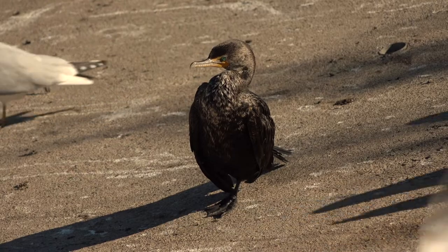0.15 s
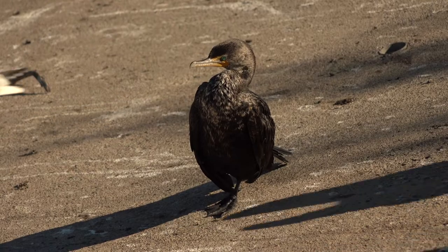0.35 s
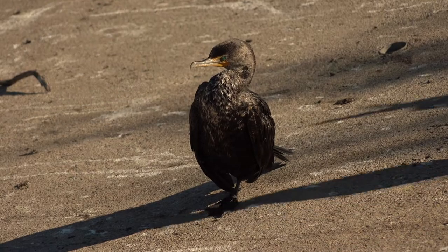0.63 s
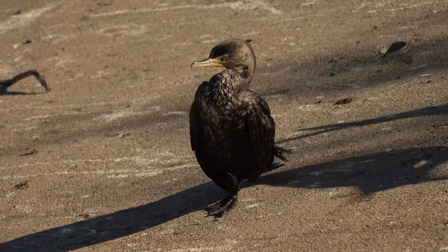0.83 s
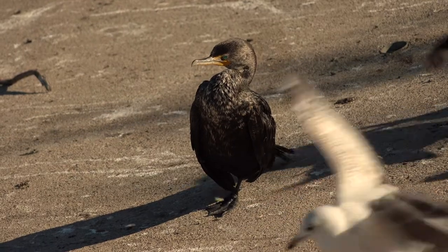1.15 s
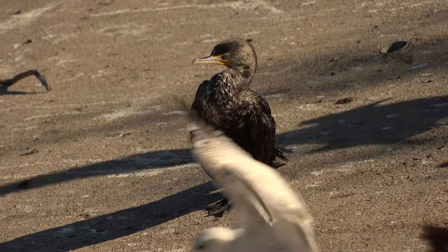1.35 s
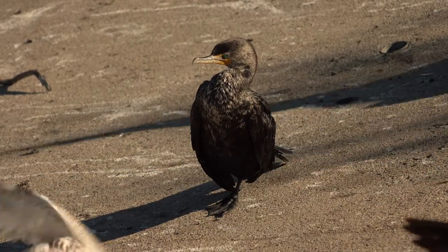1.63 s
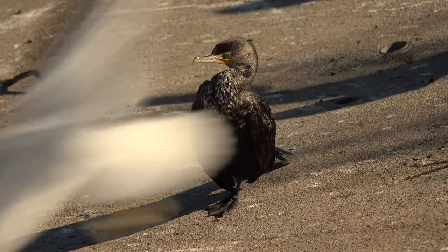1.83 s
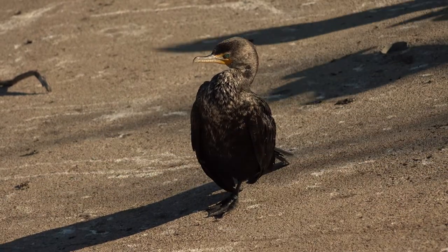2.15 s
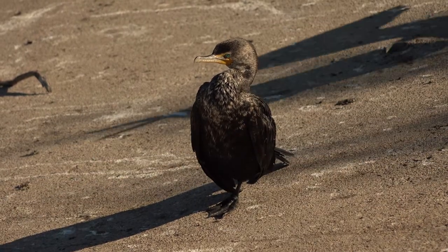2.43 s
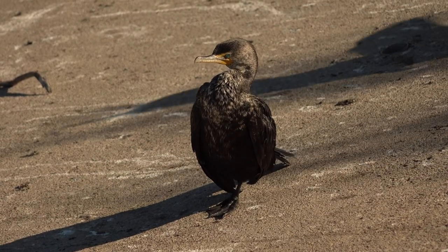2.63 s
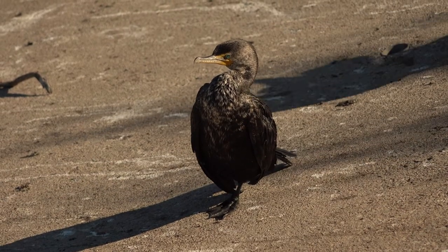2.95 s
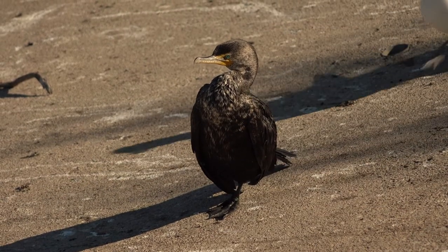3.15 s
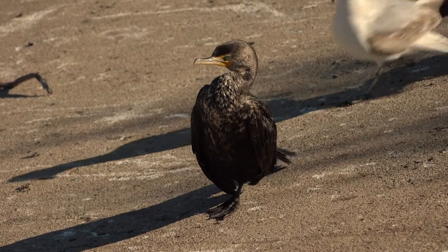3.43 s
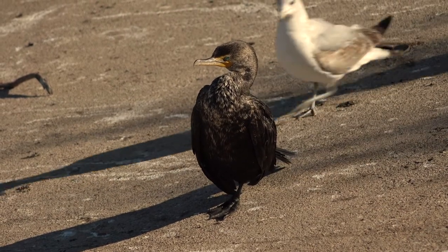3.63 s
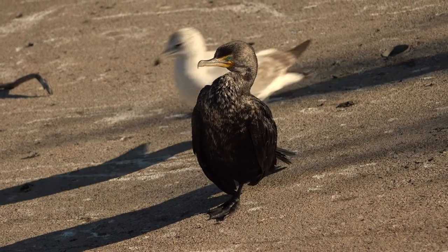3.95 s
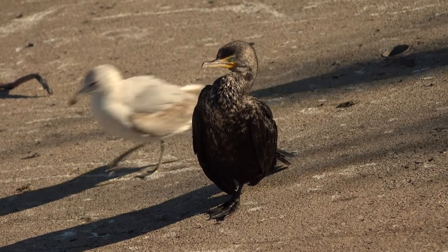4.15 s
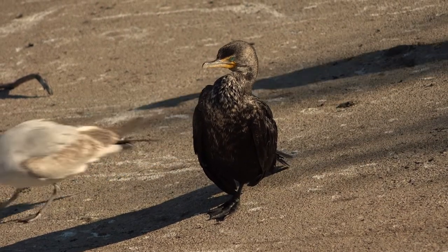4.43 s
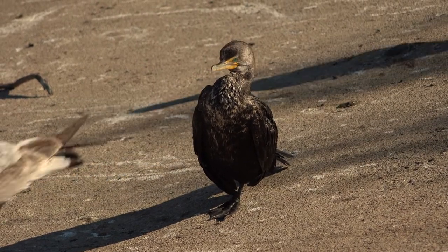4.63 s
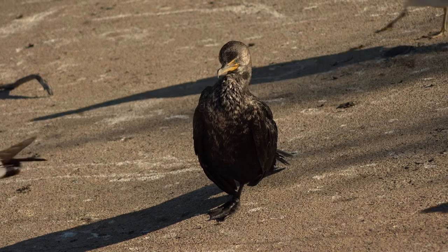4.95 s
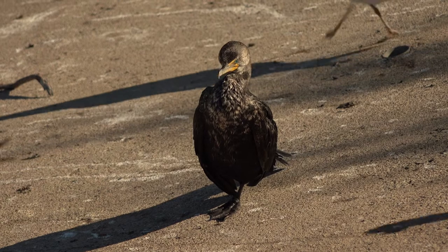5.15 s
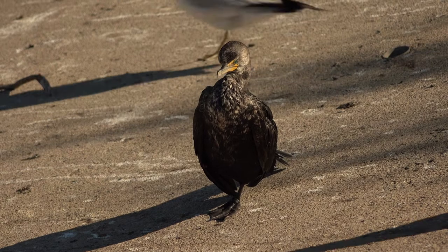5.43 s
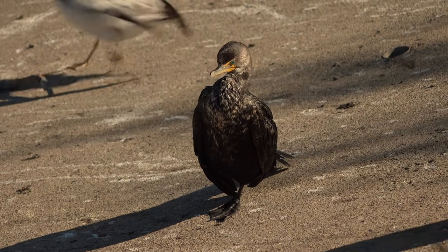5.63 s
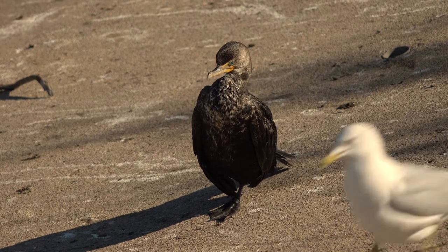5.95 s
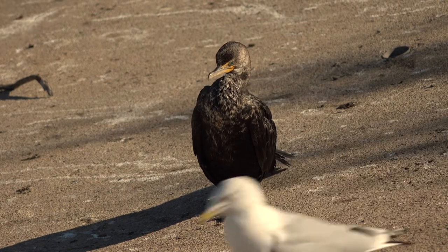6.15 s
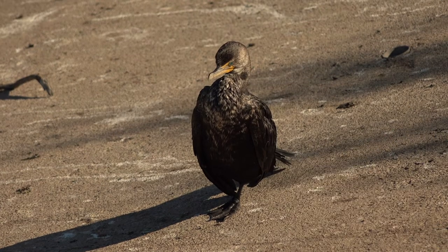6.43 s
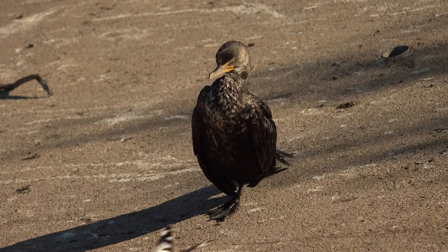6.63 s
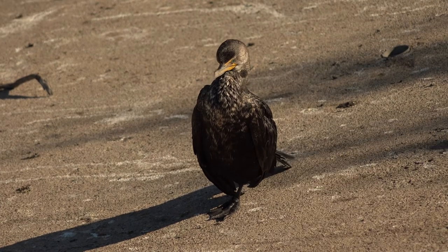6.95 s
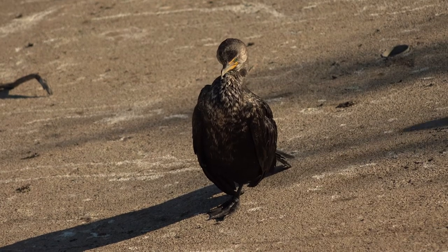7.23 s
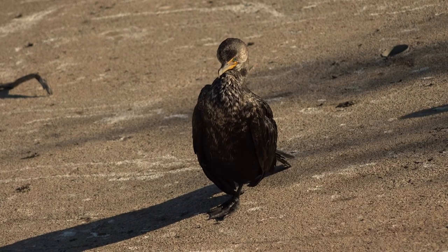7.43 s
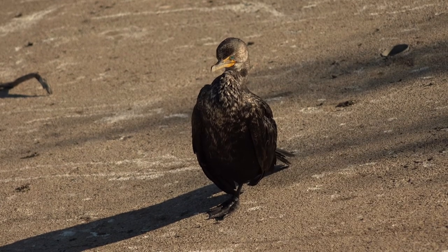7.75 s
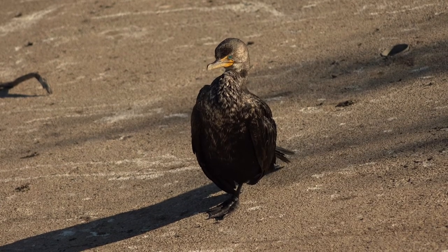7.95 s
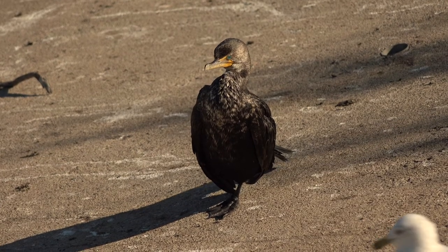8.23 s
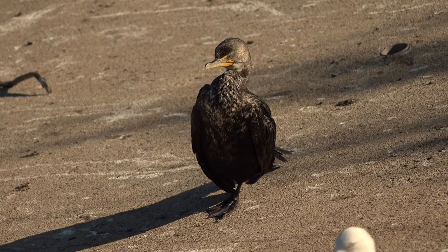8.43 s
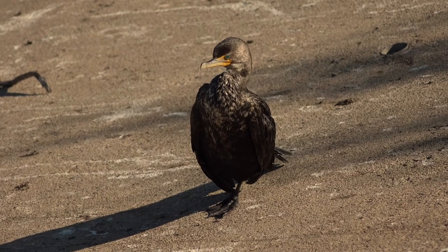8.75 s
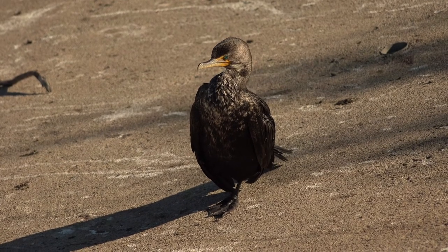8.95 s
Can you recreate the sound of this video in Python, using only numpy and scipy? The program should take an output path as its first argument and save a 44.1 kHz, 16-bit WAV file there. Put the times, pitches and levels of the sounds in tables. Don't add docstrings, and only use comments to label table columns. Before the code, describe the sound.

Close gulls on an open shore call in irregular bursts: thin whistles and croaks first, rapid laughing yelps near two seconds, then a long rasping screech after three. After a quieter gap a second screech breaks out at five, followed by yelps and mews. A lull, then chained wailing cries near eight. Gravel ticks throughout, low surf and wind, and a faint engine hum. Mono outdoor microphone, faint short echo.

```python
import sys
import numpy as np
from scipy import signal
from scipy.fft import rfft, irfft, next_fast_len
from scipy.io import wavfile
from scipy.ndimage import uniform_filter1d

SR = 44100
rng = np.random.default_rng(int(sys.argv[2]) if len(sys.argv) > 2 else 0)


def waveform_to_disk(signal):
    frames = np.transpose(np.atleast_2d(signal))
    scaled = np.clip(frames, -1, 1) * 32767
    samples = np.round(scaled).astype(np.int16)
    wavfile.write(sys.argv[1], SR, samples)


def natural_amplitude(level_db):
    exponent = np.asarray(level_db, float) / 20
    return 10 ** exponent


N = 401301

# level in dB of partial 1, 2, 3..
PURE_PARTIALS = [6.5, -14, -41, -26.5, -46]
BRIGHT_PARTIALS = [6.5, -1, -26, -36, -30]
DOUBLED_PARTIALS = [4, 9.5, -12.5, -22, -18]


def walk(rate, size):
    hold = int(SR / rate)
    steps = np.repeat(rng.standard_normal(size // hold + 1), hold)
    return 1.534 * uniform_filter1d(steps, hold)[:size]


def ring(x, hz, width):
    return signal.lfilter(*signal.iirpeak(hz, hz / width, fs=SR), x)


def ring_twice(x, hz, width):
    return ring(ring(x, hz, width), hz, width)


def unit(x):
    return x / np.sqrt(np.mean(x ** 2))


def add(out, s, x):
    i = int(s * SR)
    out[i:i + len(x)] += x[:N - i]


def fade_ends(size, rise_s, fall_s):
    t = np.arange(size) / SR
    ramp = np.clip(np.minimum(t / rise_s, t[::-1] / fall_s), 0, 1)
    return np.sin(np.pi / 2 * ramp) ** 2


def curves(table):
    s, *columns = np.transpose(table)
    t = np.arange(s[0], s[-1], 1 / SR)
    return s[0], [np.interp(t, s, c) for c in columns]


def stack(hz, partials_db, wobble=0.0073, flutter_db=5.0):
    size = len(hz)
    phase = 2 * np.pi * np.cumsum(hz * (1 + wobble * walk(300, size))) / SR
    out = 0
    for k, db in enumerate(partials_db, 1):
        level = np.sqrt(2) * natural_amplitude(db + flutter_db * walk(120, size))
        out = out + level * np.sin(k * phase) * (k * hz < .45 * SR)
    return out


def pulses(hz, scatter, size_db):
    cycles = np.cumsum(hz / SR)
    at = np.flatnonzero(np.diff(np.floor(cycles)))
    exact = at + 1 - (cycles[at + 1] % 1) * SR / hz[at]
    chance = rng.standard_normal((len(at), 2)).T
    place = np.clip(exact + chance[0] * (scatter * SR / hz)[at], 0, len(hz) - 2)
    out, size = np.zeros(len(hz)), natural_amplitude(size_db * chance[1])
    np.add.at(out, place.astype(int), size * (1 - place % 1))
    np.add.at(out, place.astype(int) + 1, size * (place % 1))
    return out


def whistles():
    out, effort = np.zeros(N), np.zeros(N)
    for s, hz, shape, partials_db in phrases():
        halved = .045 * natural_amplitude(3 * walk(60, len(hz))) * np.sin(np.pi * np.cumsum(hz) / SR)
        hoarse = 1 + 0.1 * walk(1200, len(hz)) + halved
        wobble = 13 / max(hz.mean(), 2500)
        add(out, s, shape * hoarse * stack(hz, partials_db, wobble=wobble, flutter_db=1.2))
        add(effort, s, shape * natural_amplitude(max(partials_db) - 5.5))
    sum_band = signal.butter(2, [3800, 4800], "band", fs=SR, output="sos")
    out = out + natural_amplitude(-3) * signal.sosfilt(sum_band, out ** 2)
    air = rng.standard_normal(N) * natural_amplitude(3 * walk(90, N))
    low_hiss = natural_amplitude(-21) * unit(ring_twice(air, 3700., 3000.))
    high_hiss = natural_amplitude(-30) * unit(ring_twice(air, 10000., 4000.))
    return out + effort * (low_hiss + high_hiss)


def phrases():
    for s, length, start, middle, end, db, partials_db in single_notes():
        u, hz = arch(length, start, middle, end)
        ends = fade_ends(len(u), min(.006, 0.31 * length), min(.015, 0.41 * length))
        shape = natural_amplitude(db) * (1 - 0.27 * u ** 2) * ends
        yield s, hz * (1 + .009 * walk(44.6, len(u))), shape, partials_db

    # time in seconds, pitch in Hz of the lead partial, its level in dB
    linked_wails = [
        [(7.935, 2069, -34), (7.951, 1967, -19.5), (7.975, 2115, -23), (7.995, 2070, -31), (8.023, 1887, -22.5),
         (8.049, 2020, -23.5), (8.067, 2036, -20.5), (8.085, 1856, -30), (8.095, 1830, -24)],
        [(8.095, 1802, -23), (8.125, 1985, -17.5), (8.139, 1980, -22), (8.159, 1830, -32), (8.171, 1795, -23.5),
         (8.195, 1977, -19), (8.207, 1979, -20), (8.217, 1915, -20.5), (8.235, 1879, -44)],
    ]
    linked_laughs = [
        [(1.965, 1810, -40), (1.981, 1850, -18.5), (1.991, 1737, -18.5), (2.011, 1815, -18.5),
         (2.031, 1780, -47), (2.065, 1705, -19), (2.095, 1816, -18.5), (2.12, 1716, -38)],
        [(2.12, 1744, -33), (2.134, 1690, -25.5), (2.168, 1804, -17.5), (2.202, 1690, -42), (2.214, 1700, -17),
         (2.24, 1800, -41), (2.25, 1716, -21), (2.262, 1730, -46)],
    ]
    linked_doubled = [
        [(5.796, 1867, -50), (5.808, 1774, -31), (5.82, 1775, -26), (5.835, 1920, -23), (5.842, 1930, -42),
         (5.856, 1937, -43), (5.866, 1822, -55)],
        [(5.875, 1760, -40), (5.885, 1749, -27), (5.909, 1940, -25), (5.917, 1950, -50), (5.948, 1740, -52),
         (5.957, 1750, -31), (5.992, 1870, -25), (6.003, 1780, -52)],
    ]
    linked_mews = [
        [(6.145, 2120, -51), (6.161, 2030, -28), (6.179, 2035, -22), (6.201, 2232, -39), (6.223, 1981, -29.5),
         (6.271, 2040, -21.5), (6.285, 1973, -32)],
        [(6.285, 1931, -30.5), (6.335, 2030, -23), (6.357, 1905, -45), (6.371, 1938, -28), (6.399, 2000, -26),
         (6.409, 1904, -34), (6.42, 1930, -56)],
    ]
    late_mew = [(8.575, 1260, -48), (8.585, 1085, -42), (8.613, 1130, -31), (8.635, 1175, -43),
                (8.671, 1090, -33), (8.695, 1218, -31.5), (8.72, 1091, -38)]
    late_moan = [(8.72, 1062, -38), (8.76, 1148, -26.5), (8.79, 1088, -34), (8.808, 1090, -30.5),
                 (8.818, 1177, -27), (8.83, 1188, -48)]
    screech_end = [(3.62, 1749, -30), (3.654, 1790, -29), (3.67, 1700, -20), (3.686, 1690, -31),
                   (3.714, 1795, -29), (3.729, 1670, -19), (3.745, 1650, -30), (3.768, 1700, -27),
                   (3.788, 1450, -30)]
    thin_whistles = [
        [(0.335, 3658, -43), (0.343, 3605, -26), (0.361, 3618, -28), (0.421, 3312, -35), (0.469, 3267, -37),
         (0.481, 3452, -55), (0.49, 3662, -28)],
        [(4.535, 4437, -51), (4.557, 4563, -35), (4.593, 3613, -45), (4.607, 3926, -43), (4.655, 3569, -43),
         (4.687, 3730, -39), (4.72, 3846, -57)],
    ]
    # level in dB of partial 1, 2, 3..; the wails and mews have half lines
    wail_partials = [-40, 6, -24, -3, -20, -32, -36, -34, -29, -30, -32]
    mew_partials = [-4, 8, -3.5, -3, -17.5, -18, -18, -19.5, -18, -19, -20]
    late_mew_partials = [-2, 4.5, -8, -13, -11, -26, -25]
    late_moan_partials = [-0.5, -9, -8.5, -14, -18, -28]
    screech_end_partials = [0, 5, -2, -8, -16]
    groups = ((linked_wails, wail_partials, 2),
              (linked_laughs, BRIGHT_PARTIALS, 1),
              (linked_doubled, DOUBLED_PARTIALS, 1),
              (linked_mews, mew_partials, 2),
              ([late_mew], late_mew_partials, 1),
              ([late_moan], late_moan_partials, 1),
              ([screech_end], screech_end_partials, 1),
              (thin_whistles, PURE_PARTIALS, 1))
    for tables, partials_db, lead in groups:
        for table in tables:
            s, columns = curves(table)
            hz, db = (uniform_filter1d(c, size=250, mode="nearest") for c in columns)
            shape = natural_amplitude(db - partials_db[lead - 1]) * fade_ends(len(hz), .004, .004)
            yield s, hz / lead, shape, partials_db


def single_notes():
    # start in seconds, length in seconds,
    # pitch in Hz at the middle of the note, level in dB
    pure_laugh = [(.571, 0.044, 3310, -37.5), (1.918, 0.047, 2540, -31), (2.013, 0.023, 2490, -26),
                  (2.129, 0.023, 2370, -23.5), (2.158, 0.014, 2400, -25), (2.19, 0.062, 2370, -22.5),
                  (2.329, 0.055, 2333, -25), (2.369, 0.028, 1697, -28.5), (5.224, 0.031, 4360, -19),
                  (5.284, 0.016, 4380, -22.5), (5.662, 0.063, 2510, -19.5), (5.737, 0.054, 2445, -20),
                  (5.913, 0.013, 2480, -23.5), (7.642, 0.075, 4230, -41), (7.876, .045, 2100, -40),
                  (7.607, .022, 2320, -46), (7.874, 0.062, 2615, -26), (7.974, 0.026, 2610, -28),
                  (8.215, 0.048, 1570, -38.5), (8.235, 0.039, 2300, -32), (8.299, 0.065, 1596, -30),
                  (8.321, 0.031, 2370, -26.5), (8.622, 0.038, 2010, -31.5), (5.862, .025, 1520, -41),
                  (5.935, 0.028, 1450, -43), (5.668, 0.048, 4370, -37), (5.69, 0.032, 3880, -34),
                  (5.74, 0.043, 4300, -39), (2.31, 0.023, 2310, -38), (1.638, .03, 3950, -44),
                  (1.64, .05, 2390, -48), (7.785, .06, 4450, -37.5), (8.622, .02, 3210, -35),
                  (8.69, .02, 3300, -37.5), (8.82, 0.019, 4050, -39.5)]
    bright_laugh = [(.928, .04, 1960, -48), (1.554, .023, 1580, -35), (2.267, 0.053, 1714, -25),
                    (2.553, 0.076, 2340, -40)]
    doubled_laugh = [(.273, 0.062, 2473, -43), (6.032, 0.028, 1880, -30), (6.103, 0.026, 1876, -32)]
    mews = [(6.011, 0.028, 1100, -28), (6.08, 0.028, 1082, -29), (8.373, 0.031, 1094, -32),
            (8.441, 0.05, 1065, -32), (8.513, 0.03, 1090, -32)]
    # level in dB of partial 1, 2, 3..
    short_mew_partials = [-8, 6, -6, -13, -18]
    for rows, climb, droop, partials in ((pure_laugh, 0.018, 0.03, PURE_PARTIALS),
                                         (bright_laugh, 0.018, 0.0565, BRIGHT_PARTIALS),
                                         (doubled_laugh, 0.03, 0.0074, DOUBLED_PARTIALS),
                                         (mews, 0.03, 0.00092, short_mew_partials)):
        for s, length, hz, db in rows:
            yield s, length, hz * (1 - climb - droop), hz, hz * (1 + climb - droop), db, partials

    # start in seconds, length in seconds, top pitch in Hz, level in dB
    wails = [(8.254, 0.044, 1967, -23), (8.317, 0.054, 1973, -25), (8.397, 0.04, 1943, -24.5),
             (8.479, 0.029, 1924, -26.5), (8.534, 0.046, 1982, -27.5)]
    # level in dB of partial 1, 2, 3..
    wail_partials = [5, -3.5, -24, -29, -24]
    climb, droop, sag = .1, 1.2, .05
    for s, length, hz, db in wails:
        start = hz * (1 - (climb + droop) * length)
        end = hz * min(1 + (climb - droop) * length, 1 - sag)
        yield s, length, start, hz, end, db, wail_partials

    # start in seconds, length in seconds, pitch in Hz at start, at end, level in dB
    cries = [(3.935, 0.15, 2785, 2140, -42), (3.934, 0.2, 3520, 2700, -39.5),
             (3.935, .15, 6300, 5100, -46.5), (3.955, .105, 5650, 4500, -42), (3.93, .09, 4400, 4050, -52),
             (3.94, .09, 3150, 3050, -50), (3.96, .11, 8500, 7600, -56)]
    for s, length, start, end, db in cries:
        yield s, length, start, start + .24 * (end - start), end, db, PURE_PARTIALS

    pure_slides = [(.724, .04, 4500, 4480, -32), (.571, 0.053, 4490, 5200, -33),
                   (.674, 0.018, 10600, 10200, -33.5), (1.655, 0.064, 3160, 2860, -30),
                   (1.77, 0.079, 3540, 3180, -34.5), (1.842, 0.063, 2656, 2500, -30.5),
                   (4.92, 0.055, 8900, 9600, -45), (5.352, .03, 6400, 6250, -28),
                   (4.96, .012, 3300, 3200, -22), (4.86, .17, 2643, 2830, -35),
                   (7.785, .07, 2750, 2700, -44), (4.79, 0.27, 2605, 2660, -42.5),
                   (5.02, .03, 4230, 4100, -23), (5.46, .19, 2940, 2650, -22),
                   (7.643, .1, 2314, 2850, -40.5), (7.88, 0.032, 4470, 5000, -34),
                   (8.575, 0.057, 2850, 2430, -34), (8.815, 0.0335, 1514, 1430, -38),
                   (8.862, 0.036, 1380, 1200, -41)]
    bright_slides = [(.485, 0.039, 3610, 3575, -29.5), (.519, 0.027, 4090, 4080, -22.5),
                     (.611, 0.062, 4410, 4480, -26), (4.795, 0.062, 3420, 3430, -39),
                     (4.915, 0.079, 1960, 1901, -30.5), (5.4, 0.027, 1176, 1420, -26.5),
                     (5.835, 0.02, 3080, 3070, -33.5), (6.116, 0.022, 2180, 1930, -25.5),
                     (7.73, .155, 3340, 3220, -36)]
    doubled_slides = [(.519, 0.091, 3910, 4010, -32), (4.839, .09, 2607, 2645, -37.5),
                      (7.77, 0.073, 2170, 2133, -37.5)]
    quarter_rate = [
        (5.527, .118, 706, 664, -22.5),
    ]
    shriek = [
        (4.96, 0.066, 1602, 1668, -16.5),
    ]
    chirps = [(0.76, .02, 10200, 7400, -36), (6.056, .014, 2550, 1850, -30),
              (1.712, 0.014, 2900, 3600, -34), (6.79, 0.0188, 2170, 3550, -23),
              (5.122, .017, 1470, 1090, -25.5), (1.721, 0.018, 2850, 2900, -25),
              (1.758, .012, 2200, 2500, -36), (1.735, .014, 2800, 3500, -34), (1.755, .02, 4400, 4000, -36)]
    # start in seconds, level in dB
    tweets = [(1.597, -39), (1.616, -35), (1.66, -34), (1.674, -35), (2.072, -32), (2.089, -31),
              (2.12, -30.5), (2.454, -28.5), (5.81, -38), (6.145, -42), (6.208, -41), (6.529, -34.5),
              (6.62, -36.5)]
    # level in dB of partial 1, 2, 3..
    quarter_partials = [-29, -38, -6.5, -28, -11, -2.5, -2.5, -28, -18, -24] + [-36] * 10
    shriek_partials = [-14.5, 5.5, -11, -2.5, -13, -26, -33, -32]
    small_birds = chirps + [(s, 0.0132, 5300, 3550, db) for s, db in tweets]
    for rows, partials in ((pure_slides, PURE_PARTIALS), (bright_slides, BRIGHT_PARTIALS),
                           (doubled_slides, DOUBLED_PARTIALS), (quarter_rate, quarter_partials),
                           (shriek, shriek_partials), (small_birds, [0])):
        for s, length, start, end, db in rows:
            yield s, length, start, (start + end) / 2, end, db, partials


def arch(length, start, middle, end):
    u = np.linspace(-1, 1, int(length * SR))
    return u, middle + (end - start) / 2 * u + ((start + end) / 2 - middle) * u ** 2


def throb(which, s, size):
    throb_hz = [18.7, 19.76]
    peak_s = [3.457, 5.055]
    return np.cos(2 * np.pi * throb_hz[which] * (s - peak_s[which] + np.arange(size) / SR))


def held_tones():
    # time in seconds, pitch in Hz, level in dB
    held = [
        [(3.085, 3030, -27), (3.3, 3058, -27), (3.42, 3060, -34), (3.55, 3040, -22.5), (3.635, 2980, -22)],
        [(5.03, 3320, -25), (5.16, 3290, -21), (5.225, 3240, -33), (5.255, 3340, -20), (5.33, 3230, -21),
         (5.39, 3150, -25)],
    ]
    # level in dB of the half line, the tone, then further half steps
    held_partials = [
        [-21, 1, -20, -2, -27, -28],
        [-30, 1, -24, -10, -27, -28],
    ]
    out = np.zeros(N)
    for which, table in enumerate(held):
        s, (hz, db) = curves(table)
        pump = throb(which, s, len(hz))
        swell_db = [13, (3.5, 5.5)[which], 11, 11, 6, 6]
        hz = hz * (1 + .008 * throb(which, s + 1 / 80, len(hz)))
        tone = 0
        for k, d in enumerate(held_partials[which]):
            tone = tone + natural_amplitude(swell_db[k] * pump) * stack((k + 1) * hz / 2, [d], flutter_db=1.8)
        add(out, s, natural_amplitude(db) * fade_ends(len(hz), 0.016, 0.0066) * tone)
    return out


def rasps():
    # time in seconds, level in dB, drop in dB while locked to the held tone
    rasp = [
        [(3.085, -12, 0), (3.11, -20, 0), (3.25, -23, 2), (3.4, -22, 5), (3.5, -21, 16), (3.55, -21, 10),
         (3.64, -22, 7), (3.76, -24, 2), (3.79, -24, 0)],
        [(4.995, -36, 0), (5.02, -15, 0), (5.12, -18.5, 3), (5.22, -19.5, 6), (5.3, -22, 8), (5.35, -25, 12),
         (5.385, -36, 0), (5.41, -26.5, 0), (5.5, -34.5, 0)],
    ]
    # pitch in Hz, level in dB
    side_tones = [
        [(1820, -7), (2420, -1.5), (3560, 2), (3930, 3), (4750, 3.5), (5500, -16), (6900, -10), (7900, -9.5),
         (9400, -23), (11300, -25)],
        [(1950, -8), (2650, -8), (3300, 2.5), (4200, 5), (5100, -2.5), (5850, -1), (6600, -12), (7600, -6),
         (8400, -11.5)],
    ]
    # centre in Hz, width in Hz, level in dB
    bill = [(2300, 900, -17), (4300, 2300, -9), (9500, 900, -22), (11500, 1400, -22), (13500, 1500, -24.5)]
    slip_rate = [524, 559]
    slip_depth = [.8, .5]
    throb_db = [2.5, 3]
    breath_db = [2, 4]
    out = np.zeros(N)
    for which, table in enumerate(rasp):
        s, (db, drop_db) = curves(table)
        size = len(db)
        db = db - drop_db * ((1 + throb(which, s - .008, size)) / 2) ** 3
        fade_db = -8 * np.clip(np.arange(size) / SR / .2, 0, 1) ** 2
        pump = throb(which, s, size)
        slip_hz = np.full(size, slip_rate[which])
        slip = np.sin(2 * np.pi * np.cumsum(slip_hz * (1 + .01 * walk(20, size))) / SR)
        lift = 1 + .012 * pump
        voice = 0
        for f, d in side_tones[which]:
            level = natural_amplitude(2.2 * walk(70, size) + fade_db * (f > 9000))
            level = level * (1 + slip_depth[which] * slip * (f > 2200))
            hz = f * lift * (1 + .012 * walk(30, size))
            voice = voice + level * stack(hz, [d], wobble=.012, flutter_db=2.5)
        voice = unit(voice)
        breath = unit(pulses(slip_hz, 0.08, 3)) + 0.8 * rng.standard_normal(size)
        for f, width, d in bill:
            level = natural_amplitude(d + breath_db[which] + 3 * walk(50, size) + fade_db * (f > 9000))
            voice = voice + level * unit(ring_twice(breath, f, width))
        voice = voice + natural_amplitude(-21) * slip
        add(out, s, natural_amplitude(db + throb_db[which] * pump) * fade_ends(size, 1 / 50, 1 / 50) * voice)
    return out


def croaks():
    # start in seconds, length in seconds, first click rate in Hz, throat pitch in Hz, level in dB
    throat_calls = [(0.515, 0.075, 330, 2000, -39), (0.865, 0.06, 302, 3200, -45),
                    (1.265, 0.049, 498, 1380, -35), (1.523, 0.047, 278.3, 1420, -28),
                    (2.57, 0.043, 230, 1770, -31), (3.02, 0.077, 290, 2480, -24),
                    (3.028, 0.07, 299, 4660, -23), (3.263, 0.069, 263, 655, -35.5),
                    (4.871, 0.052, 314.6, 3170, -21), (4.884, .04, 320, 5500, -20),
                    (1.13, .04, 330, 2500, -46), (3.03, .06, 330, 9200, -38), (1.712, .06, 420, 3000, -38),
                    (2.13, .11, 440, 4200, -40), (5.258, 0.0614, 215, 434, -32),
                    (5.387, .11, 217.4, 430, -35.5), (6.424, 0.045, 475, 1850, -35.5),
                    (4.918, .05, 460, 8400, -32), (6.805, .085, 170, 2800, -40),
                    (6.515, 0.08, 270, 2700, -43), (8.559, 0.5, 295, 2150, -43),
                    (8.558, 0.54, 269, 2620, -46)]
    out = np.zeros(N)
    for s, length, start, throat_hz, db in throat_calls:
        end = min(start + 6 / length, 510)
        clicks = pulses(np.linspace(start, end, int(length * SR)), .002 + .08 * length, .7)
        width = 0.35 * throat_hz
        voice = ring(ring(clicks, throat_hz, width), throat_hz, 1.9 * width)
        octave = ring(ring(clicks, 2.0 * throat_hz, width), 2.3 * throat_hz, 2 * width)
        soften = signal.butter(6, throat_hz + 2200, fs=SR, output="sos")
        voice = signal.sosfilt(soften, voice + natural_amplitude(-9) * octave)
        add(out, s, natural_amplitude(db) * fade_ends(len(clicks), .02, .014) * unit(voice))
    return out


def squawk_and_grunt():
    # time in seconds, pitch in Hz, level in dB
    squawk = [(1.295, 700, -32), (1.33, 650, -31.5), (1.4, 600, -29.5), (1.44, 565, -29),
              (1.49, 597, -28.5), (1.525, 547, -28.5), (1.548, 432, -29)]
    grunt = [(4.33, 218, -35.5), (4.38, 263.6, -34.5), (4.47, 271.4, -34), (4.51, 295.4, -34.5),
             (4.57, 236, -34.5)]
    # level in dB of partial 1, 2, 3..
    squawk_partials = [1.5, 1.5, -2, -12.5, -4.5, -11.5, -6, -9, -24]
    grunt_partials = [-18, 2.5, -2, -13, -32, -23, -17, -18, -31, -37, -28, -15, -28]
    out = np.zeros(N)
    for table, partials in ((squawk, squawk_partials), (grunt, grunt_partials)):
        s, (hz, db) = curves(table)
        effort_db = db - db.max()
        dulled = [d + k * 0.95 * effort_db for k, d in enumerate(partials)]
        voice = unit(stack(hz, dulled, wobble=0.0054, flutter_db=2.5))
        add(out, s, natural_amplitude(db) * fade_ends(len(hz), 0.002, 1 / 200) * voice)
    return out


def ticks():
    # time in seconds, peak level in dB
    clear_ticks = [(0.864, -21), (1.27, -17.5), (3.3567, -14), (3.715, -14), (3.8464, -20.5), (4.0287, -22),
                   (4.1746, -21), (4.462, -28), (4.5656, -26), (4.689, -31), (8.07, -31), (8.197, -31),
                   (4.153, -32), (4.197, -33), (4.247, -32), (6.308, -18.5), (6.665, -24), (7.0703, -26.5),
                   (7.1701, -23), (8.1534, -16.5), (8.8236, -22), (9.0118, -17.5)]
    foot_knocks = [(.995, -31), (1.14, -31), (2.44, -32), (2.517, -29), (2.678, -32), (2.752, -29),
                   (2.918, -30), (6.918, -29), (7.168, -29), (7.61, -30)]
    out, t = np.zeros(N), np.arange(int(SR / 50)) / SR
    faint = rng.random((260, 3)) * [N / SR, 11, 8000] + [0, -41, 2500]
    events = [(s, db, 8500.) for s, db in clear_ticks]
    events += [(s, db, 3300.) for s, db in foot_knocks]
    for s, db, hz in events + list(faint):
        crack = ring(rng.standard_normal(len(t)) * np.exp(-t / .0026), hz, .7 * hz)
        add(out, s, natural_amplitude(db) * crack / np.abs(crack).max())
    return out


def flaps():
    # middle in seconds, level in dB
    wing_beats = [(.8, -42.5), (3.04, -40), (4.679, -41.5), (7.499, -39.5)]
    out, size = np.zeros(N), SR // 10
    for s, db in wing_beats:
        puff = unit(ring(rng.standard_normal(size), 470.0, 1500.)) * np.hanning(size)
        add(out, s - 1 / 20, natural_amplitude(db) * puff)
    return out


def echo_tail(t60_s, late_s):
    t = np.arange(SR // 2) / SR
    tail = rng.standard_normal(len(t)) * natural_amplitude(-60 * t / t60_s) * (t > late_s)
    return tail / np.sqrt(np.sum(tail ** 2))


def surf_and_wind():
    # frequency in Hz, level in dB per Hz
    shore_colour = [(12, -32), (20, -6.5), (43, 3.5), (130, -2.5), (172, -4.5), (388, -12), (513, -13),
                    (759, -15), (1810, -31), (4540, -29), (9140, -31), (14700, -37.5), (16000, -41)]
    # time in seconds, wind rumble in dB, far traffic in dB
    gusts = [(0.0, -43.5, -46), (2.18, -40, -42.5), (5.58, -43.5, -40.5), (9.1, -43, -42.5)]
    size = next_fast_len(N, True)
    f = np.fft.rfftfreq(size, 1 / SR) + 1
    colour_hz, colour_db = np.transpose(shore_colour)
    colour = natural_amplitude(np.interp(np.log(f), np.log(colour_hz), colour_db)) * rfft(rng.standard_normal(size))
    gust_s, *gust_levels = np.transpose(gusts)
    t = np.arange(N) / SR
    wind_db, road_db = (np.interp(t, gust_s, c) - np.mean(c) for c in gust_levels)
    out, swell = 0, walk(1.53, N)
    for step in range(21):
        share = np.clip(1 - np.abs(2 * np.log2(f / 20) - step), 0, 1)
        band = irfft(colour * share, size)[:N]
        slow_db = wind_db if step < 5 else road_db if 6 <= step < 10 else 0
        out = out + band * natural_amplitude(.6 * swell + 1.6 * walk(12, N) + slow_db)
    return natural_amplitude(-35) * unit(out)


def engine_hum():
    # time in seconds, pitch in Hz, level in dB
    engine = [
        (0.0, 136.6, -41),
        (4.599, 127.9, -44),
        (9.1, 121.3, -38.5),
    ]
    s, hz, db = np.transpose(engine)
    t = np.arange(N) / SR
    pitch = np.interp(t, s, hz) * (1 + .015 * walk(6, N))
    level = natural_amplitude(np.interp(t, s, db) + 2.3 * walk(7, N) - 0.5)
    return level * stack(pitch, [0, -14], flutter_db=0.5)


def scene():
    birds = whistles() + held_tones() + rasps() + croaks() + squawk_and_grunt() + ticks() + flaps()
    sea_wall = natural_amplitude(-20) * echo_tail(.32, 0.011)
    ground = natural_amplitude(-17) * echo_tail(.09, .004)
    echo = signal.fftconvolve(birds, sea_wall + ground)[:N]
    return (birds + echo + surf_and_wind() + engine_hum())[None]


def low_pass(x):
    return signal.sosfilt(signal.butter(12, 16820, fs=SR, output="sos"), x)


def record(dry):
    rounded = .9 * np.tanh(dry / .9)
    top_cut = signal.ellip(8, .2, 70, 15900, fs=SR, output="sos")
    return low_pass(signal.sosfilt(top_cut, rounded))


dry = scene()
out = record(dry)
waveform_to_disk(out)
```